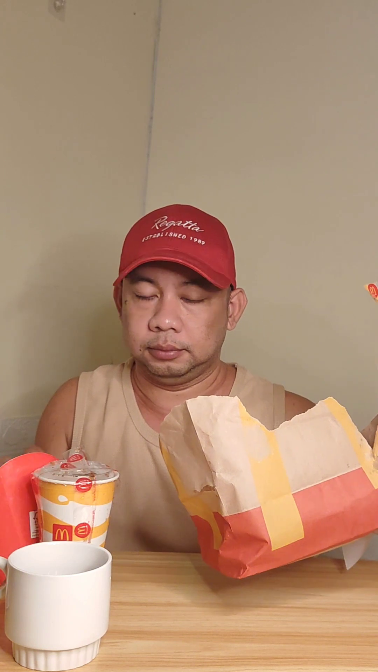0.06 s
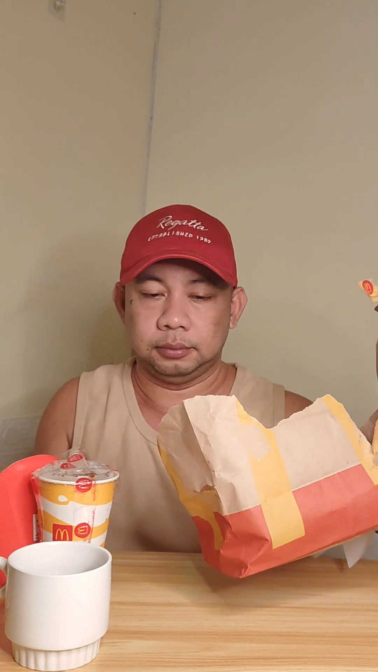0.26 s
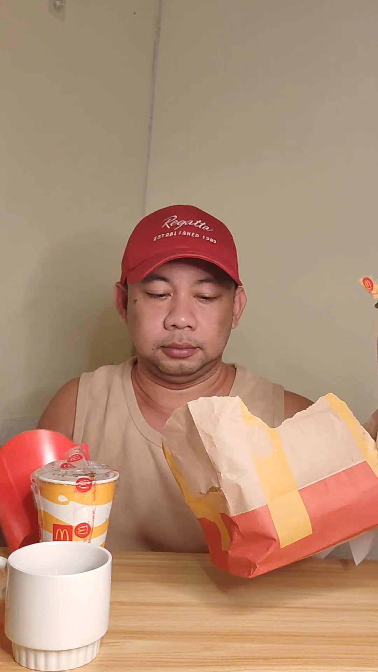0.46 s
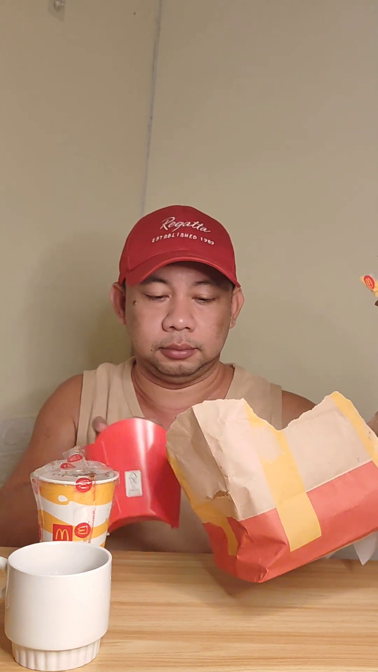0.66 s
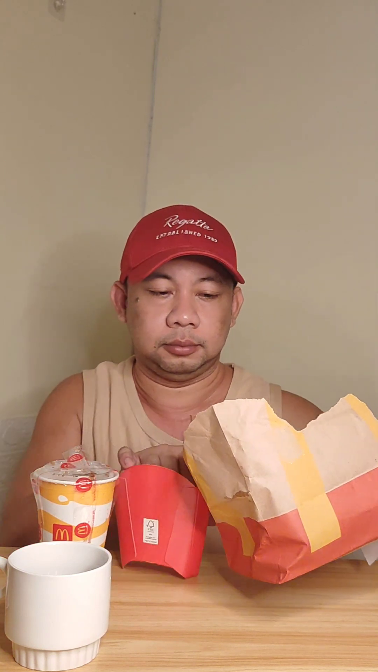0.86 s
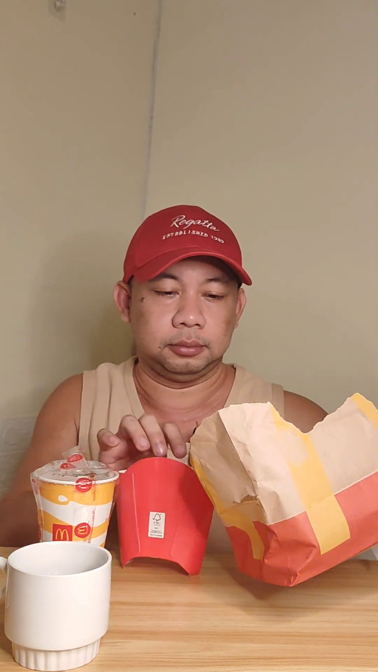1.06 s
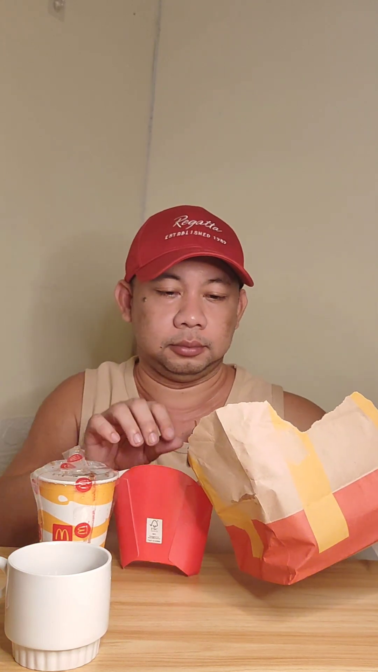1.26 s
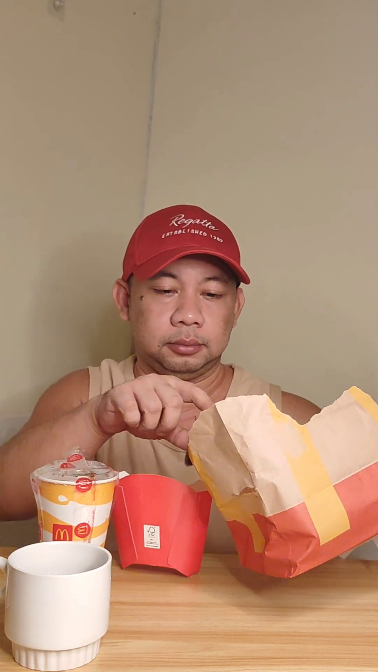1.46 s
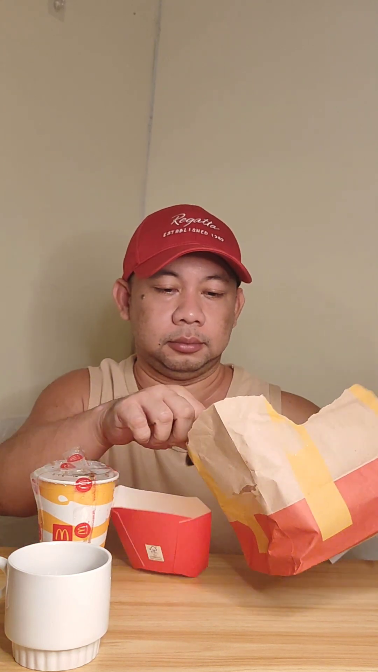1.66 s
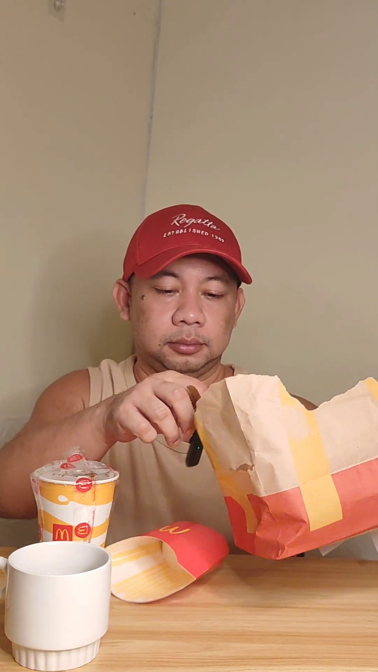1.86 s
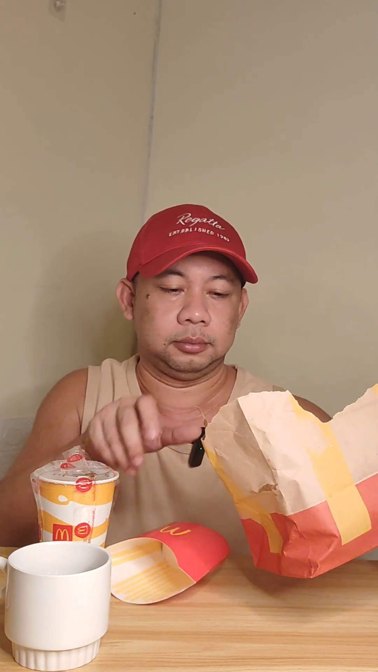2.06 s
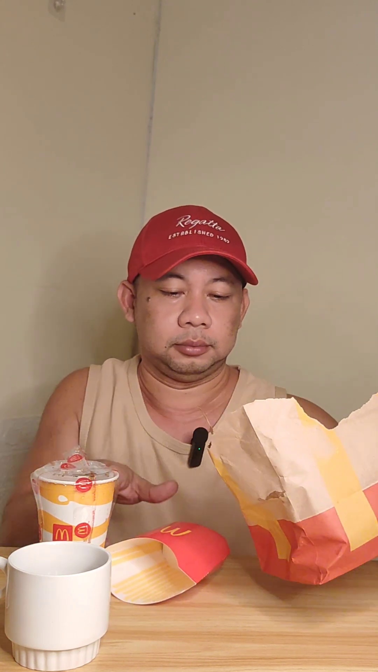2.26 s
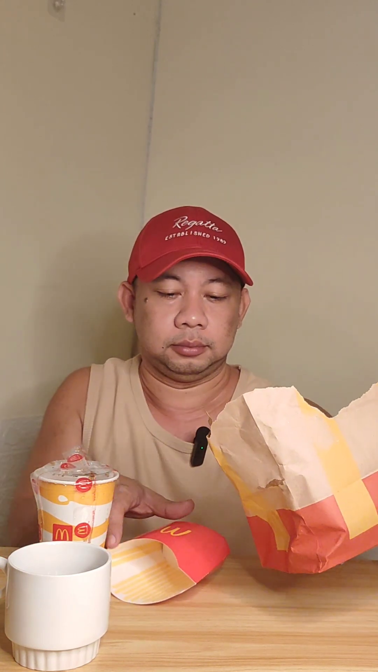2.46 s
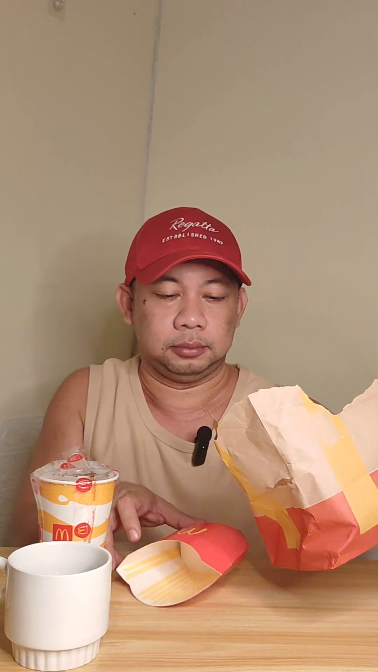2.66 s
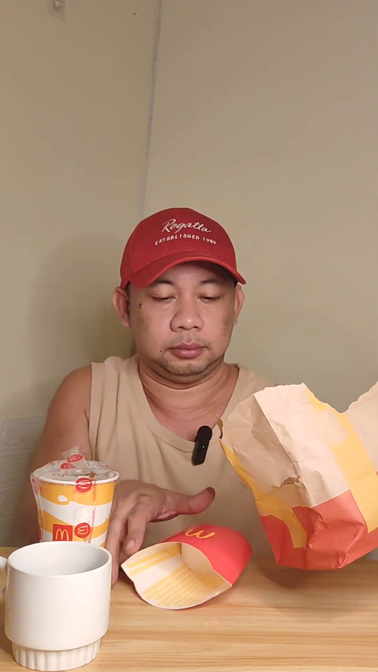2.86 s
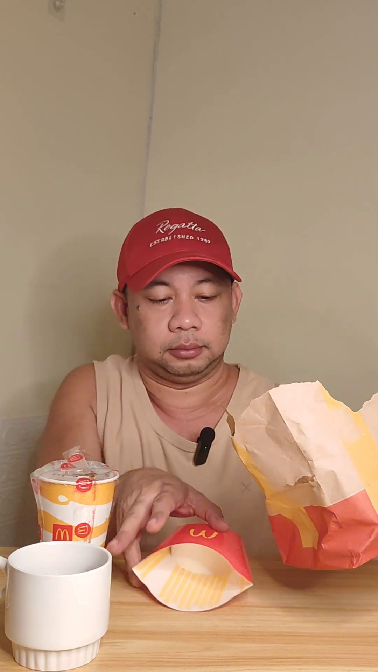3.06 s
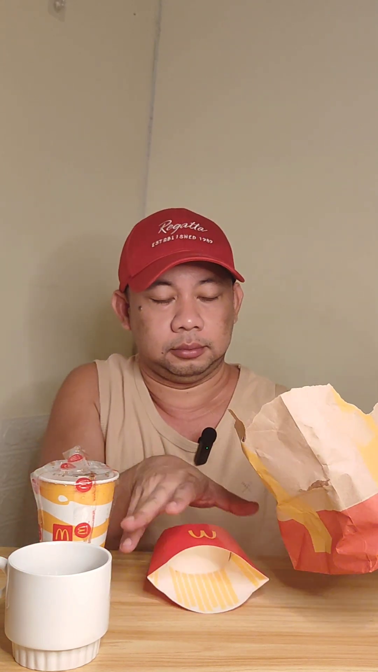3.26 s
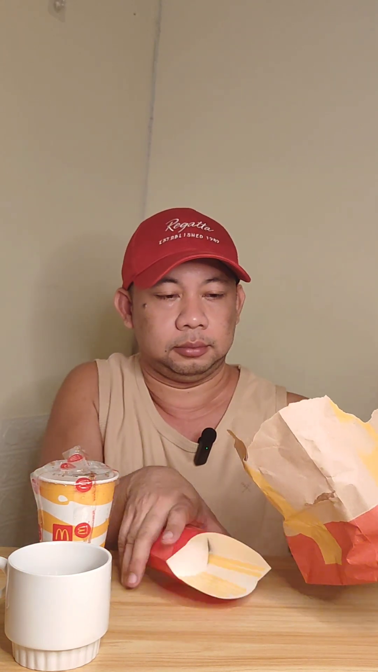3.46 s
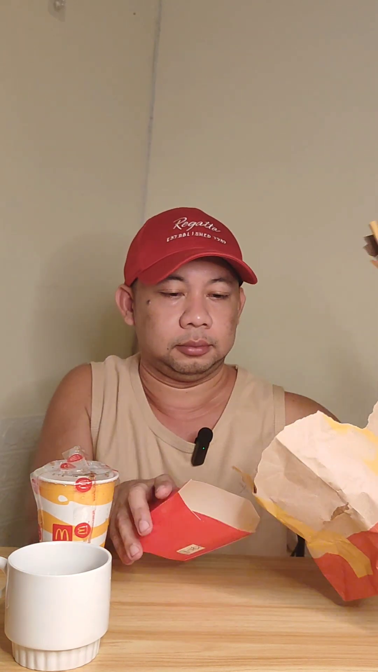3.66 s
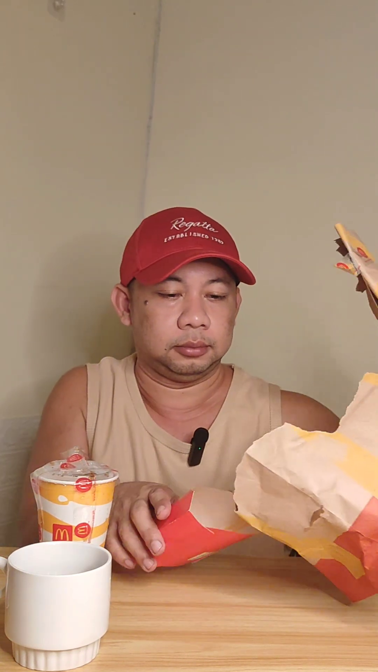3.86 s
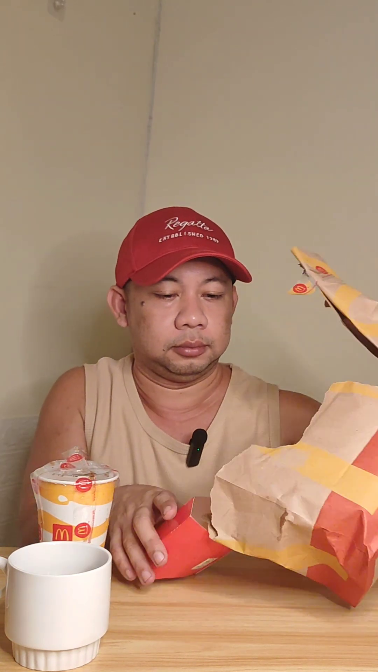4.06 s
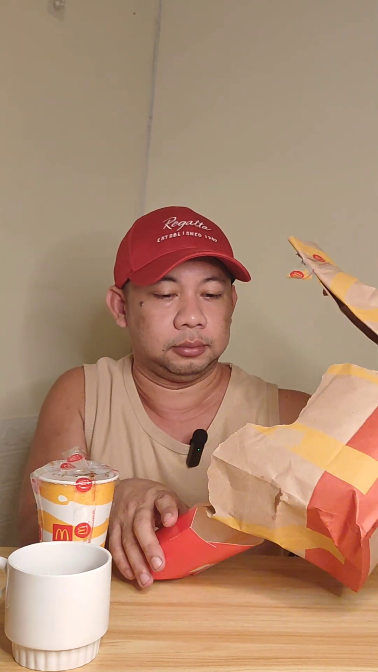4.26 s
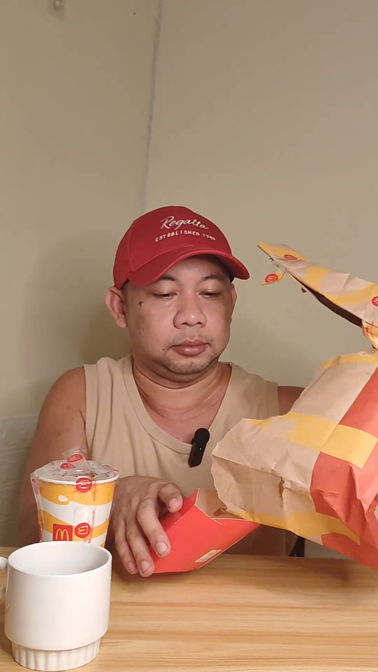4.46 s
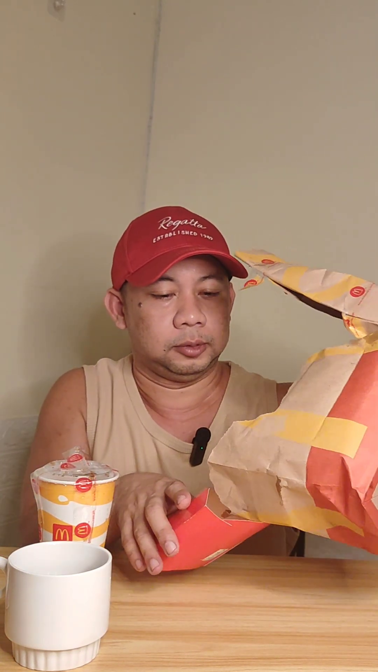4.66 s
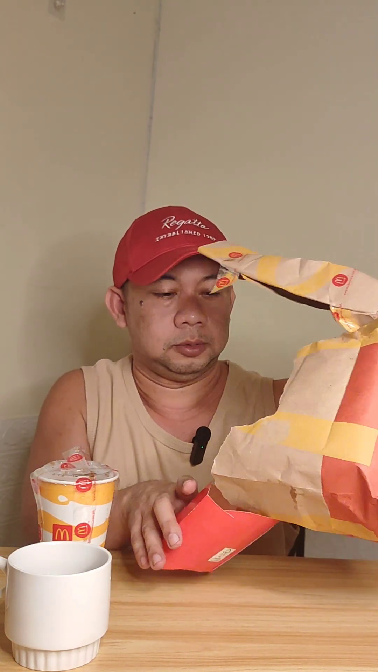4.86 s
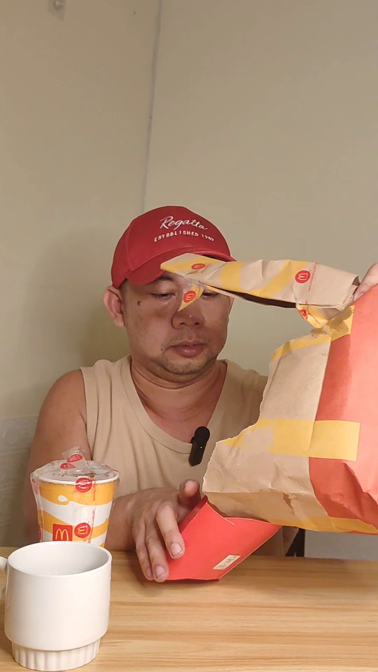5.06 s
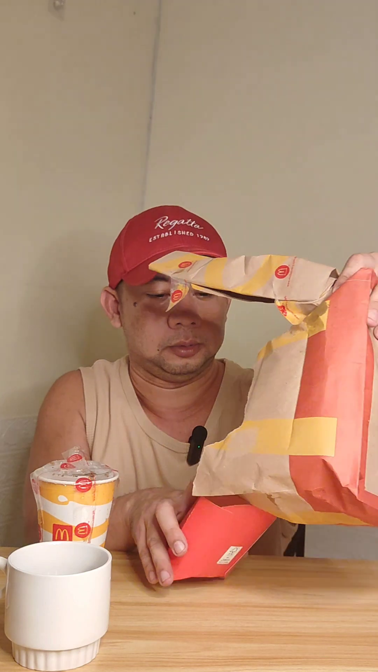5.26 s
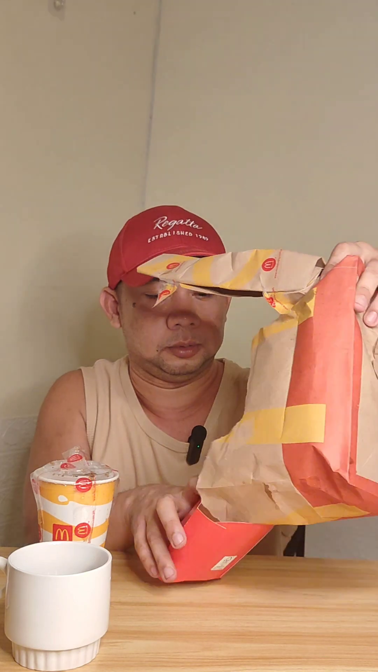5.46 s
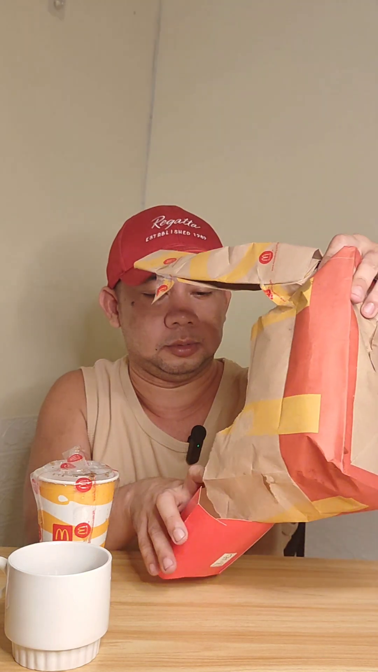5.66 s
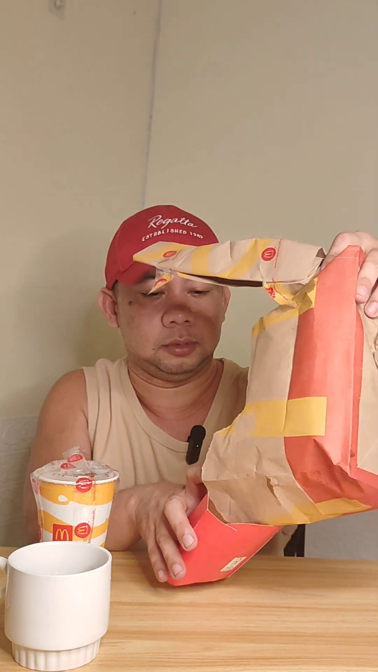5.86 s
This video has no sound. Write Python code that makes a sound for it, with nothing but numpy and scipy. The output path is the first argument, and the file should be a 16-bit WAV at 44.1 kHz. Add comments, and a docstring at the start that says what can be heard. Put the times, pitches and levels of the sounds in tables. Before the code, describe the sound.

A small empty cardboard carton scrapes, knocks and tips over on a wooden table, then a stiff paper bag crinkles and rustles busily.

```python
"""On a wooden table an empty cardboard carton is slid, set down, tipped over and nudged: clicking friction
and knocks drive the resonances of card, and narrow noise sings where something rubs.
Then a paper bag is lifted and tilted: dense small buckles swish, creases snap as short bursts of slips.
Decaying low tones with puffs of noise make dull bumps of the carton and later flaps of the bag wall.
Throughout: a small hard-walled room and steady hiss, alike in both channels."""
import sys
import numpy as np
from scipy import signal
from scipy.fft import rfft, irfft
from scipy.io import wavfile
from scipy.ndimage import uniform_filter1d

SR = 44100
rng = np.random.default_rng(int(sys.argv[2]) if len(sys.argv) > 2 else 0)


def put_to_file(sound):
    """Save the sound as 16-bit audio at rate SR, in the file named by the first command-line argument."""
    columns = np.atleast_2d(sound).T  # one column per channel
    safe = np.clip(columns, -1, 1)
    whole_steps = np.round(safe * 32767)
    wavfile.write(sys.argv[1], SR, whole_steps.astype(np.int16))


N = 260631
TIME = np.arange(N) / SR


def from_db(db):
    """Decibels to amplitude gain."""
    return 10 ** (np.asarray(db) / 20)


def rms_one(x):
    """Scale to unit power."""
    return x / np.sqrt(np.mean(x ** 2) + 1e-20)


def at_hz(points, hz):
    """Read a table on a log-frequency axis."""
    points = np.array(points)
    return np.interp(np.log(hz + 1), np.log(points[:, 0]), points[:, 1])


def band(x, edges_hz, order=4):
    """Causal band-pass."""
    return signal.sosfilt(signal.butter(order, edges_hz, "band", fs=SR, output="sos"), x + 1e-18)


def convolve(x, response):
    """Pass a sound through an impulse response."""
    return signal.fftconvolve(x, response)[:len(x)]


def add(track, s, sound):
    """Mix a sound into a track at a time in seconds."""
    at = max(0, round(s * SR))
    track[at:at + len(sound)] += sound[:N - at]


def drift(per_s):
    """Smooth random curve of RMS 1, with per_s knots each second."""
    knots = rng.standard_normal(int(N / SR * per_s) + 2)
    return rms_one(np.interp(TIME * per_s, np.arange(len(knots)), knots))


def body(colour, modes, modes_db, ripple_db, detune=0.043, damping_hz=70, size=4096):
    """Impulse response of one facet: a few detuned resonances over a randomly rippled mass of damped ones."""
    hz = np.fft.rfftfreq(size, 1 / SR)
    power = from_db(at_hz(colour, hz)) ** 2
    for centre_hz, width_hz, db in modes:
        tuned_hz = centre_hz * (1 + detune * (2 * rng.random() - 1))
        offset = (hz - tuned_hz) / (width_hz + damping_hz)   # the hand damps every mode
        power = power + from_db(db + modes_db) ** 2 / (1 + offset ** 2) ** 2
    ripple = np.interp(np.sqrt(hz / hz[-1]), np.linspace(0, 1, 48), rng.standard_normal(48))
    log_power = np.log(power * from_db(ripple_db * ripple) ** 2)
    cepstrum = irfft(log_power)[:size // 2]   # minimum phase: nothing sounds early
    cepstrum[0] /= 2
    return irfft(np.exp(rfft(cepstrum, size)))


# Each row: frequency in Hz, spectral level in dB, relative.
HISS_COLOUR = [(180, -30), (300, -14), (342, -4), (391, -0.5), (835, -7.5), (1260, -13.5), (2320, -17),
               (3450, -17), (7880, -19.5), (15500, -19.5)]
HISS_RMS_DB = -59


def hiss():
    """Quiet room air and microphone hiss: coloured steady noise with no bass."""
    air = convolve(rng.standard_normal(N), body(HISS_COLOUR, [], modes_db=0, ripple_db=-1.5))
    return from_db(HISS_RMS_DB) * rms_one(band(air, (310, 17000), order=10))


# Reverberation of the bare room. Each row: frequency in Hz, time to decay by 60 dB in seconds.
ROOM_T60 = [(400, 0.22), (1200, 0.31), (3700, 0.11), (10000, 0.17)]


def room(x, wet_db, gap_s, size=26000):
    """Diffuse reflections from bare walls: noise bands, each decaying at its own rate, after a gap."""
    t, tail = TIME[:size], 0
    edges_hz = np.geomspace(330, 17000, 8)
    for low_hz, high_hz in zip(edges_hz, edges_hz[1:]):
        t60_s = at_hz(ROOM_T60, np.sqrt(low_hz * high_hz))
        noise = band(rng.standard_normal(size) * (t > gap_s), (low_hz, high_hz), order=2)
        tail = tail + noise * from_db(-60 * t / t60_s)
    return x + from_db(wet_db) * convolve(x, tail / np.sqrt(np.sum(tail ** 2)))


# Dull bumps of the carton and flaps of the bag wall. Each row: start in seconds, level in dB before trim.
BUMPS = [(0.555, -19), (1.831, -13.5), (4.037, -17), (4.117, -28), (4.81, -21), (5.43, -23), (5.618, -10)]


def bumps(pitch_hz, decay_s, puff_db, trim_db, size=6000):
    """A broad panel gives way: a few low cycles and a puff of air, dying exponentially."""
    out, t = np.zeros(N), TIME[:size]
    for s, level_db in BUMPS:
        puff = from_db(puff_db) * rms_one(band(rng.standard_normal(size), (45, 280), order=2))
        tone = np.sin(2 * np.pi * pitch_hz * t)
        add(out, s, from_db(level_db + trim_db) * (tone + puff) * np.exp(-t / decay_s))
    return out


# Card or fingers rub and one panel of carton or table sings.
# Each row: start in seconds, length in seconds, starting pitch in Hz, level at mid-rub in dB.
RUBS = [(0.001, .165, 1260, -39.5), (.091, .082, 4540, -45.5), (.11, .18, 795, -45),
        (.421, .118, 6150, -47.5), (.427, .108, 1730, -43.5), (.431, .095, 968, -35), (.56, .285, 62, -47),
        (.868, .07, 2410, -53.5), (1.015, .086, 442, -43), (1.072, .245, 5850, -56),
        (1.096, .215, 9250, -60), (1.702, .058, 1112, -47), (1.916, .048, 472, -27.5), (1.98, .22, 72, -43),
        (2.107, .108, 4030, -56.5), (2.22, .084, 512, -39), (2.226, .072, 3860, -45.5),
        (2.357, .048, 14050, -45), (2.637, .118, 14550, -32), (2.64, .138, 738, -33.5),
        (2.696, .032, 5100, -29.5), (2.888, .094, 498, -42), (3.134, .05, 3100, -45.5),
        (3.156, .118, 532, -42.5), (3.171, .1, 5700, -51), (3.503, .023, 4500, -37)]
RUB_WIDTH_HZ, RUB_WIDTH_SHARE = 45, .12   # resonance width: fixed part plus share of pitch
RUB_SAG_SHARE = 0.0236   # fall of pitch as the finger slows


def rubs():
    """Friction feeds one narrow resonance: low-passed noise moved up to a gliding pitch."""
    out = np.zeros(N)
    for s, length_s, hz, level_db in RUBS:
        along = np.clip((TIME - s) / length_s, 0, 1)
        on = (along > 0) & (along < 1)
        phase = 2 * np.pi * np.cumsum(hz * (1 - RUB_SAG_SHARE * along[on])) / SR
        width_hz = RUB_WIDTH_HZ + RUB_WIDTH_SHARE * hz
        low_pass = signal.butter(2, width_hz / 2, fs=SR, output="sos")
        noise = signal.sosfilt(low_pass, rng.standard_normal((2, SR)))[:, :len(phase)]
        singing = rms_one(noise[0] * np.cos(phase) + noise[1] * np.sin(phase))
        out[on] += from_db(level_db) * np.sin(np.pi * along[on]) * singing
    return out


CROSSOVERS_HZ, CROSSOVER_ORDERS = (300, 1600, 6500), (7, 3, 3)
CROSSOVERS = [[signal.butter(order, hz, kind, fs=SR, output="sos") for kind in ("low", "high")]
              for hz, order in zip(CROSSOVERS_HZ, CROSSOVER_ORDERS)]


def registers(x):
    """Split a sound into rumble, hollow, rasp and sizzle, in phase with each other."""
    parts = [x + 1e-18]
    for low, high in CROSSOVERS:
        pairs = [(signal.sosfilt(low, part), signal.sosfilt(high, part)) for part in parts]
        parts = [below + above for below, above in pairs[:-1]] + list(pairs[-1])
    return parts


RASP_SHARE = 0.72   # share of the brightness given to the rasp; the sizzle gets all


def voicing(level_db, bright_db):
    """Levels of hollow, rasp and sizzle: a faster, drier contact tilts the sound to the treble."""
    return level_db, level_db + RASP_SHARE * bright_db, level_db + bright_db


EASE_DB_PER_S = 5   # before PRESSURE_LAW


def pressure_db(t, s, attack_s, hold_s, release_s):
    """One stroke of the hand: it presses, slowly eases off and lets go."""
    press_db = -20 * np.maximum((s - t) / attack_s, 0)
    ease_db = -EASE_DB_PER_S * np.clip(t - s, 0, hold_s)
    let_go_db = -20 * np.maximum((t - s - hold_s) / release_s, 0)
    return press_db + ease_db + let_go_db


PRESSURE_LAW = (1.7, 1.1, 1.236, 1.4)   # exponents of rumble, hollow, rasp, sizzle


def effort(strokes, t):
    """Gains of the four registers at times t: powers of the pressure; overlapping strokes add in power."""
    power = 0
    for *shape, level_db, bright_db, rumble_db in strokes:
        gains = from_db([level_db + rumble_db, *voicing(level_db, bright_db)])
        pressed_db = np.maximum(pressure_db(t, *shape), -120)
        power = power + (gains[:, None] * from_db(np.outer(PRESSURE_LAW, pressed_db))) ** 2
    return np.sqrt(power)


def crackle(per_s, spread_db, clump_db, clumps_per_s, rub_db):
    """Fibres catch and slip: clicks of very unequal size, in clumps, over smooth rubbing."""
    sizes = from_db(spread_db * np.minimum(rng.exponential(1, N), 4))
    clicks = sizes * rng.choice([-1, 1], N) * (rng.random(N) < per_s / SR)
    rubbing = from_db(rub_db) * rng.standard_normal(N)
    force = (rms_one(clicks) + rubbing) * from_db(clump_db * drift(clumps_per_s))
    return force / np.sqrt(uniform_filter1d(force ** 2, size=1800) + 1e-9)   # the hand keeps the work steady


UNSTEADY_DB, UNSTEADY_PER_S = 0.5, 44   # the pressure wavers


def rustle(strokes, force, facets, shifts_per_s, trims_db):
    """Slips wander from facet to facet; pressure and speed set how strongly each register speaks."""
    span_s = np.array([strokes[0][0] - .15, strokes[-1][0] + .5])
    start, end = np.clip(span_s * SR, 0, N).astype(int)
    active = np.argmax([(drift(shifts_per_s) + rng.random(N))[start:end] for facet in facets], axis=0)
    sheet = sum(convolve(force[start:end] * (active == k), facet) for k, facet in enumerate(facets))
    out = np.zeros(N)
    for part, gain, trim_db in zip(registers(sheet), effort(strokes, TIME[start:end]), trims_db):
        out[start:end] += rms_one(part) * gain * from_db(trim_db)
    return out * from_db(UNSTEADY_DB * drift(UNSTEADY_PER_S))


def hits(rows, facets, rise_s, decay_s, contact_hz, crack_db, trims_db, size=3000):
    """Each hit is an avalanche of tiny slips that swells to one crack, dies and leaves its facet ringing."""
    lead_s, crest_s = .012, .002
    out, t = np.zeros(N), TIME[:size] - lead_s - crest_s
    swell = np.exp(np.minimum(t / rise_s, -t / decay_s))
    for (s, level_db, bright_db, peak_db), facet in zip(rows, facets):
        slips, grit = rng.standard_normal((2, size))
        ring = convolve(swell * slips * from_db(2.45 * grit), facet)
        for part, db, trim_db in zip(registers(ring)[1:], voicing(level_db, bright_db), trims_db):
            add(out, s - lead_s, from_db(db + trim_db) * rms_one(part))
        crack = band(facet, (450, min(contact_hz, .4 * SR)), order=4)   # a softer contact is duller
        add(out, s + crest_s, from_db(peak_db + crack_db) * crack / np.abs(crack).max())
    return out


# Card without its modes. Each row: frequency in Hz, spectral level in dB, relative.
CARD = [(30, -6), (60, -15.5), (110, -14.5), (160, -9), (290, -32), (450, -5.5), (700, 3.5), (1130, 7),
        (1830, -13), (3600, -7.5), (4900, -10.5), (7300, -20), (10500, -15), (15000, -12)]
# Carton tipped over. Each row: centre in Hz before detuning, width in Hz before damping, dB before trim.
TOPPLE_MODES = [(480, 17, 5), (668, 21, 7), (850, 42, -14), (2175, 80, -10), (2850, 86, -16.5),
                (3420, 360, -14), (4940, 24, -24), (6040, 61, -24)]
# Carton meets table. Each row: start in seconds, level in dB, brightness in dB re level, crack in dB;
# before trims.
KNOCKS = [(0.122, -34.5, -21, -13), (0.149, -32.5, -19, -15), (0.348, -48, -10, -31),
          (0.544, -18.5, -10.5, 4.5), (0.619, -24, -15, -13), (0.776, -42.5, -9, -34), (0.964, -32, -2, -7),
          (1.028, -22, -20, 2), (1.143, -34, -27, -6.5), (1.706, -59.5, 6, -37), (1.753, -25.5, -6, -10),
          (1.822, -18.5, -21, 0), (1.838, -24.5, -10, 2), (1.906, -23, 4.5, 0), (1.928, -22.5, -5, -6),
          (1.976, -18, -5.5, 12.5), (2.056, -21, -13, 7), (2.104, -29, -33, -5.5), (2.228, -47, -11, -19),
          (2.247, -49.5, 10.5, -14), (2.287, -47.5, 7.5, -18), (2.365, -65, 12, -38),
          (2.626, -42, -13, -18), (2.707, -30, 7.5, -6), (2.818, -34.5, -16, -17), (2.897, -36, -35, -11),
          (3.266, -31, -4, -22), (3.521, -28, -2, 0)]


def carton_knocks():
    """Card knocks on wood: a fast avalanche of slips and a dull crack, each on a fresh facet."""
    facets = [body(CARD, TOPPLE_MODES, modes_db=-4, ripple_db=4.5) for row in KNOCKS]
    return hits(KNOCKS, facets, rise_s=0.0014, decay_s=.003, contact_hz=2290, crack_db=-14,
                trims_db=(-9, -7.5, -8))


# Carton pushed, stood, nudged, gripped. Each row: centre in Hz before detuning, width in Hz before damping,
# dB before trim.
PUSH_MODES = [(957, 94, 14.5), (3370, 64, -3), (4080, 160, -5.5), (4750, 210, -8.5)]
STAND_MODES = [(737, 29, 11), (1030, 64, 4), (1390, 17, -1), (1980, 30, -3), (2590, 80, -0.5),
               (3900, 65, -7), (4340, 22, -9), (4200, 28, -17), (4980, 120, -10)]
NUDGE_MODES = [(735, 8.2, 9.5), (1334, 100, 5), (2750, 290, -1.5), (4440, 240, 0), (4680, 80, -10),
               (5460, 110, -4)]
GRIP_MODES = [(692, 23, 4.5), (1020, 47, -12), (2610, 32, -10), (3320, 250, -8.5), (3760, 79, -18),
              (4300, 53, -17), (4960, 44, -23)]
# Ways of holding the carton, in turn. Each row: modes, rasp trim in dB.
HOLDS = [(PUSH_MODES, -1.3), (STAND_MODES, 9.8), (TOPPLE_MODES, -5), (NUDGE_MODES, -3.5), (GRIP_MODES, 2.7)]
HOLD_CHANGES_S = (.93, 1.6, 2.5, 3.1)
# Carton over table. Each row: end of attack in seconds, attack, hold and release in seconds, level in dB,
# brightness and rumble in dB re level. Attack and release span 20 dB before PRESSURE_LAW; levels before trims.
SCRAPES = [ (0.002, .01, 0.01, 0.071, -26, -11.5, -20), (0.047, .05, 0.042, .08, -45, -22, -50),
           (0.135, 0.074, .012, 0.037, -33, -13.5, -55), (.35, 0.0069, .07, .1, -45.5, -23, -42),
           (0.453, .035, 0.096, .07, -35, -2, -29), (0.57, 0.032, 0.047, 0.069, -25.5, 0, -15),
           (0.697, 0.037, 0.012, 0.096, -45.5, 0, -10), (0.884, 0.065, 0.022, 0.036, -38, -11, -48),
           (0.975, 0.028, 0.013, 0.063, -20.5, -7.5, -53), (1.027, .03, 0.086, 0.087, -32.5, -23, -38),
           (1.296, .015, 0.039, 0.12, -55, -27, 2.5), (1.757, 0.013, 0.029, 0.12, -21, -2.5, -12),
           (1.832, 0.039, 0.057, 0.095, -23, -1.5, -8), (1.926, 0.022, 0.022, 0.13, -25.5, -3.5, -8),
           (2.01, 0.034, 0.07, .19, -28.5, -10, -11.5), (2.073, .02, .01, 0.03, -32, 4, -10),
           (2.24, 0.014, 0.059, 0.085, -37, -11, -12.5), (2.66, 0.022, 0.01, 0.043, -25.5, -2.5, -43),
           (2.706, .016, .012, 0.077, -25.5, 0.5, -55), (2.76, 0.054, 0.064, 0.091, -33.5, -13, -55),
           (2.898, .01, 0.0081, 0.12, -36, -38, -56), (3.05, 0.033, 0.046, .1, -55.5, -18, -30),
           (3.147, 0.035, 0.097, 0.046, -38, -13.5, -49), (3.269, 0.011, 0.064, 0.063, -28.5, -8, -38),
           (3.521, 0.017, 0.012, 0.051, -27.5, -2, -32), (3.576, .03, 0.044, 0.07, -33, -7.5, -36)]


def carton_scrapes(count=6):
    """Card drags on wood: stick-slip crackle wanders over facets that change with the hold."""
    force = crackle(per_s=2500, spread_db=4.5, clump_db=1.5, clumps_per_s=170, rub_db=-2.0)
    out = np.zeros(N)
    for index, (modes, rasp_db) in enumerate(HOLDS):
        strokes = [stroke for stroke in SCRAPES if np.searchsorted(HOLD_CHANGES_S, stroke[0]) == index]
        facets = [body(CARD, modes, modes_db=3.5, ripple_db=4.5) for k in range(count)]
        out += rustle(strokes, force, facets, shifts_per_s=18, trims_db=(0.6, -0.7, rasp_db, 1.4))
    return out


# Paper without its modes. Each row: frequency in Hz, spectral level in dB, relative.
PAPER = [(30, -22), (62, -13.5), (100, -10.5), (160, -12), (340, -4), (680, 2), (1200, -0.5), (1800, -12.5),
         (2800, -7.5), (5000, -9), (7500, -13), (10500, -7), (14800, -2), (16000, -6)]
# Bag resonances. Each row: centre in Hz before detuning, width in Hz before damping, dB before trim.
BAG_MODES = [(268, 8, -0.5), (660, 69, -2.5), (3460, 290, -6)]


def paper_facets(count):
    """Facets of stiff paper, each detuned and rippled at random."""
    return [body(PAPER, BAG_MODES, modes_db=-9.5, ripple_db=3.5) for k in range(count)]


# One row per pull or turn of the arm. Each row: end of attack in seconds, attack, hold and release in seconds,
# level in dB, brightness and rumble in dB re level. Spans and trims as in SCRAPES.
SWISHES = [ (3.786, 0.071, 0.069, 0.051, -23.5, 5, -55), (3.866, .03, 0.12, 0.11, -21.5, 1.3, -9),
           (4.055, 0.074, 0.066, 0.074, -25, 3, -4), (4.125, .03, 0.056, .06, -22.5, -5.5, -3),
           (4.205, 0.1, .04, .04, -27, -10, -11), (4.258, 0.023, 0.075, .17, -27, 0, -9),
           (4.426, .05, 0.028, 0.13, -39.5, 0, -20), (4.6, 0.052, 0.19, .1, -31.5, -8.5, -21),
           (4.8, 0.25, 0.097, 0.23, -25, -3.5, -5.5), (4.98, 0.13, 0.059, 0.23, -25, 1.5, -12),
           (5.238, 0.069, 0.038, 0.12, -23, 4.5, -13), (5.33, 0.12, .12, 0.19, -20, -1, -8.5),
           (5.612, 0.081, 0.079, .1, -21, -1, -5.5), (5.75, 0.19, 0.14, .1, -21.5, 1.5, -12)]


def bag_swishes(count=20):
    """Stiff paper crumples in a dense stream of small buckles that wanders quickly over its facets."""
    force = crackle(per_s=3000, spread_db=3.6, clump_db=2.2, clumps_per_s=200, rub_db=-4)
    return rustle(SWISHES, force, paper_facets(count), shifts_per_s=90, trims_db=(0.36, 0.48, -0.8, 0.92))


SMALL_SNAP_DB, SMALL_SNAP_SPREAD_DB, SMALL_SNAP_BRIGHT_DB = -13, 6, 0   # re swish, before trims


def small_snaps(count):
    """Small creases give at random times, as strongly as the bag is being worked."""
    when, size, bright = rng.random(count), rng.standard_normal(count), rng.standard_normal(count)
    s = SWISHES[0][0] + when * (TIME[-1] - SWISHES[0][0])
    swish_db = 20 * np.log10(effort(SWISHES, s)[1])   # hollow register
    level_db = swish_db + SMALL_SNAP_DB + SMALL_SNAP_SPREAD_DB * size
    bright_db = SMALL_SNAP_BRIGHT_DB + SMALL_SNAP_SPREAD_DB * bright
    return list(zip(s, level_db, bright_db))


# Big creases snap through. Each row: start in seconds, level in dB, brightness in dB re level; before trims.
SNAPS = [(3.887, -27, 3), (3.915, -24.5, 5), (3.961, -29, 9), (3.997, -24.5, 5.5), (4.043, -18, -1),
         (4.12, -15, -14), (4.255, -17, -2.5), (4.306, -17, -9), (4.34, -35.5, 8), (4.359, -28.5, 4.5),
         (4.394, -31, 4.5), (4.425, -39.5, 10), (4.455, -37, 6), (4.468, -42, 16.5), (4.601, -23, 1),
         (4.618, -34, 11.5), (4.702, -21, 6), (4.731, -23.5, 4), (4.805, -19, 1.5), (4.863, -19.5, -7.5),
         (4.977, -25.5, 7), (5.038, -29, 8.5), (5.079, -33, 9), (5.12, -25.5, 8), (5.271, -23.5, -2),
         (5.405, -19.5, -1), (5.447, -32, 12), (5.499, -22, 6), (5.881, -26, 4)]


def bag_snaps():
    """Creases snap through: short avalanches of slips with a bright crack that follows the treble."""
    snaps = [(s, db, bright_db, db + bright_db) for s, db, bright_db in SNAPS + small_snaps(count=26)]
    return hits(snaps, paper_facets(len(snaps)), rise_s=0.0019, decay_s=0.0043, contact_hz=9500,
                crack_db=-9.0, trims_db=(-8.5, -10.5, -5.8))


def scene():
    """Carton and bag in the room, alike in both channels."""
    carton = carton_scrapes() + carton_knocks() + rubs()
    bag = bag_swishes() + bag_snaps()
    panels = bumps(pitch_hz=157.6, decay_s=0.013, puff_db=-17.0, trim_db=-4.5)
    mono = room(carton + bag + panels, wet_db=-9.5, gap_s=0.00459) + hiss()
    return np.stack([mono, mono])


CUTOFF_HZ = 15550


def record(dry, top=0.51):
    """Only the tallest peaks are rounded; the highest treble is cut."""
    rounded = dry / (1 + (dry / top) ** 8) ** (1 / 8)
    return signal.sosfilt(signal.ellip(10, .3, 80, CUTOFF_HZ, fs=SR, output="sos"), rounded)


dry = scene()
out = record(dry)
put_to_file(out)
```